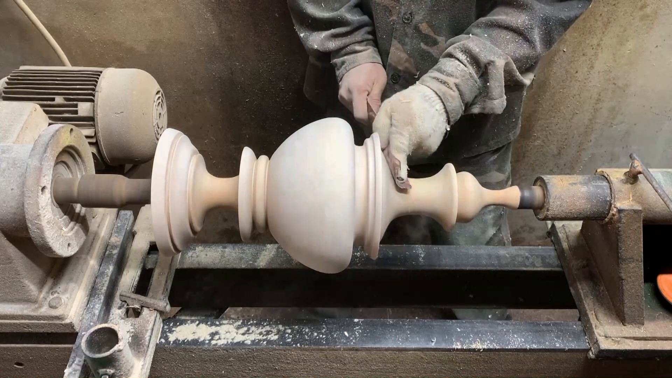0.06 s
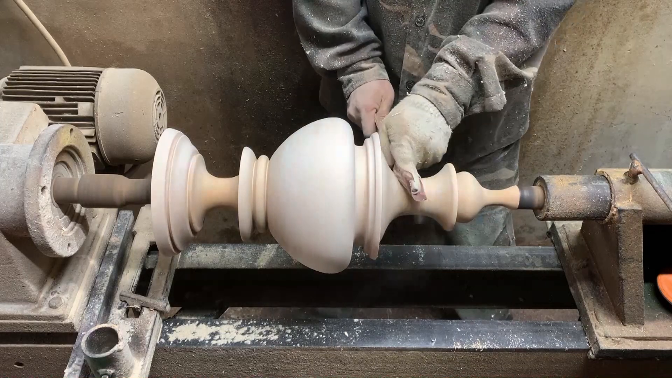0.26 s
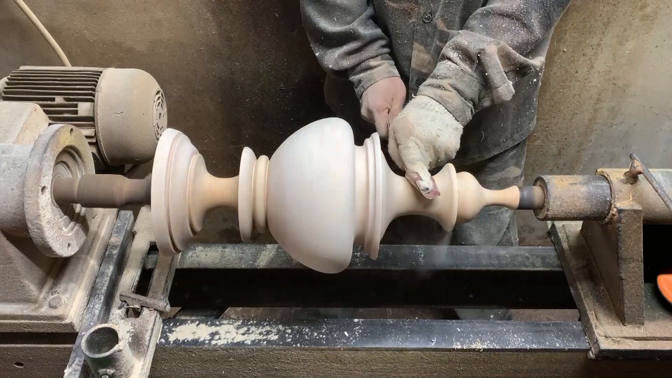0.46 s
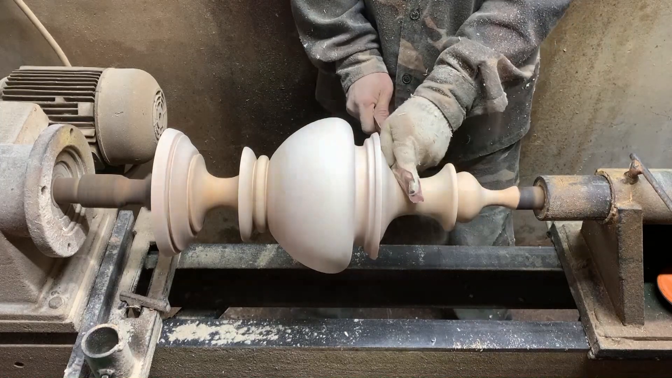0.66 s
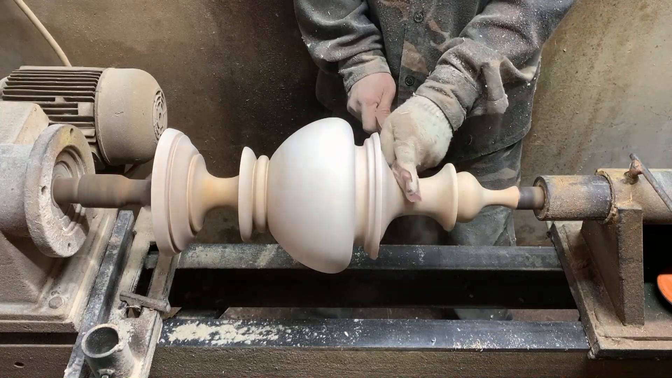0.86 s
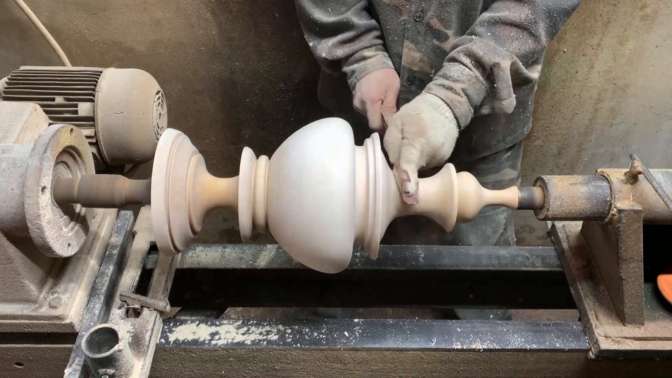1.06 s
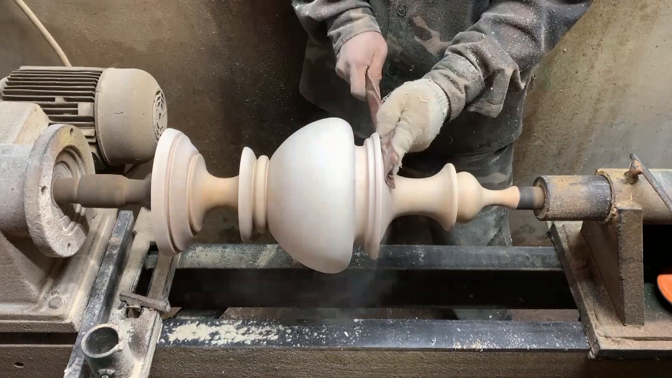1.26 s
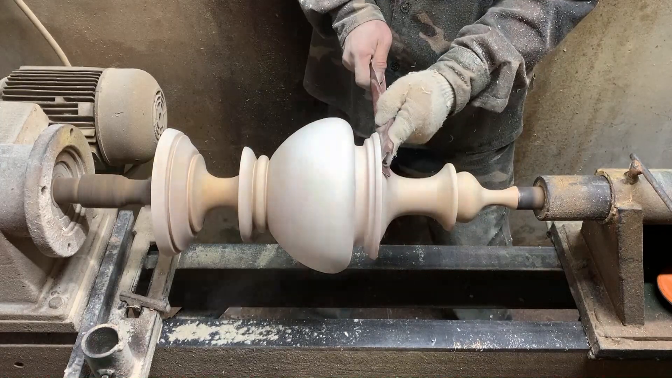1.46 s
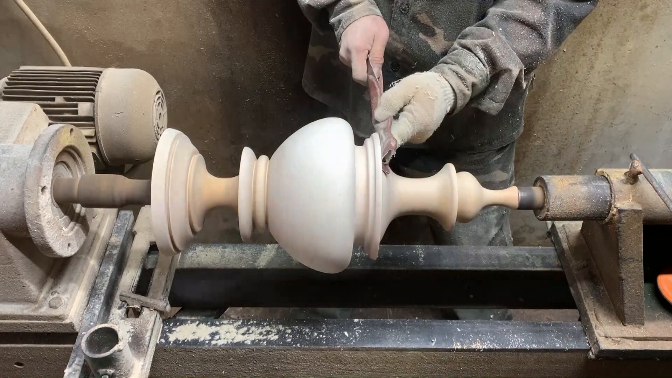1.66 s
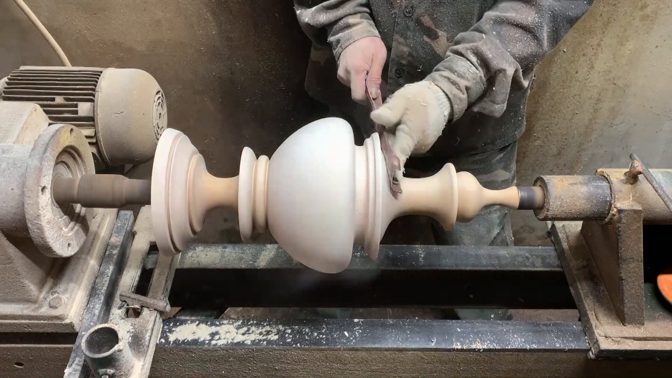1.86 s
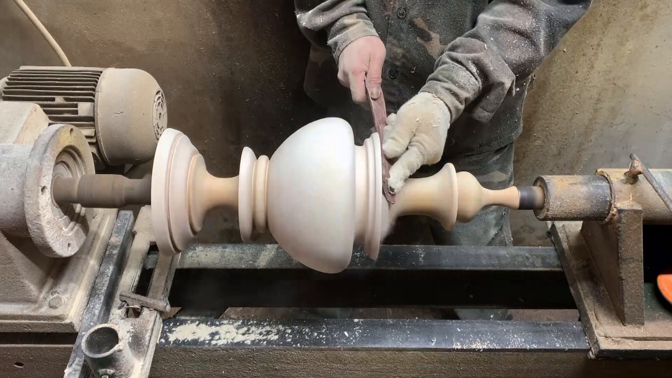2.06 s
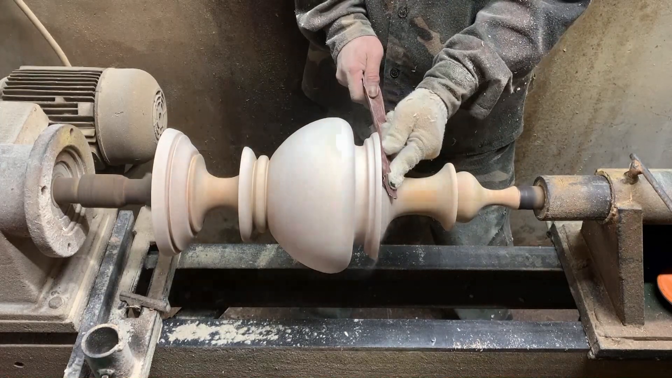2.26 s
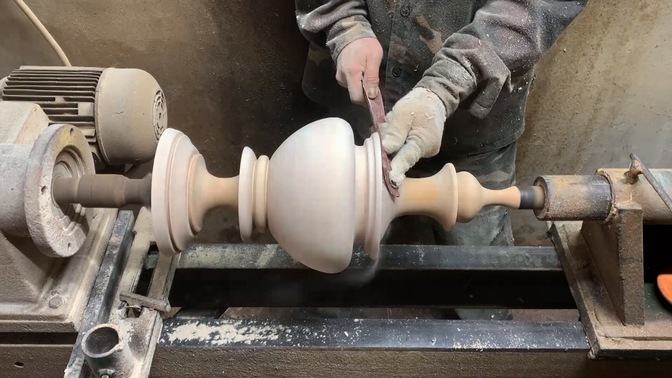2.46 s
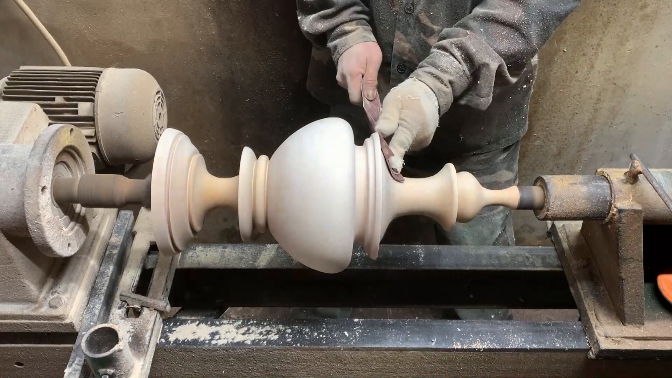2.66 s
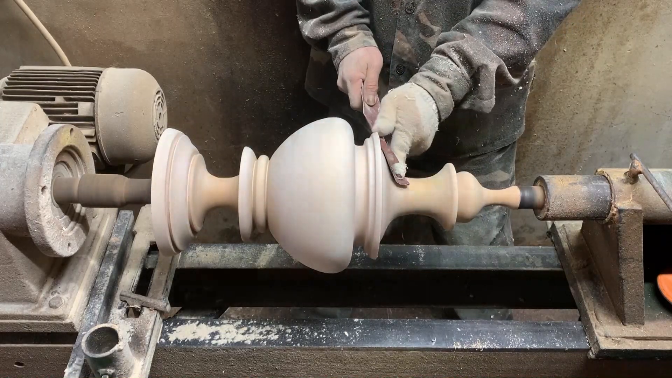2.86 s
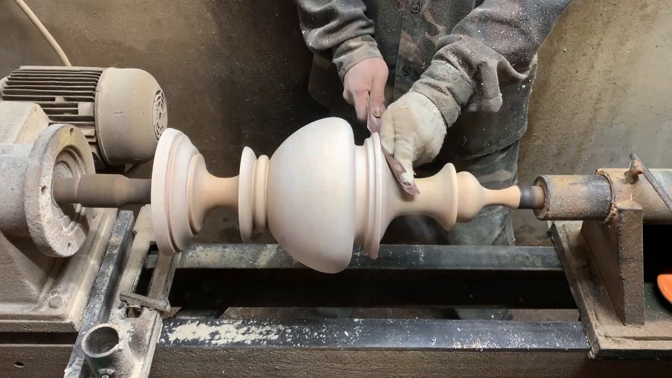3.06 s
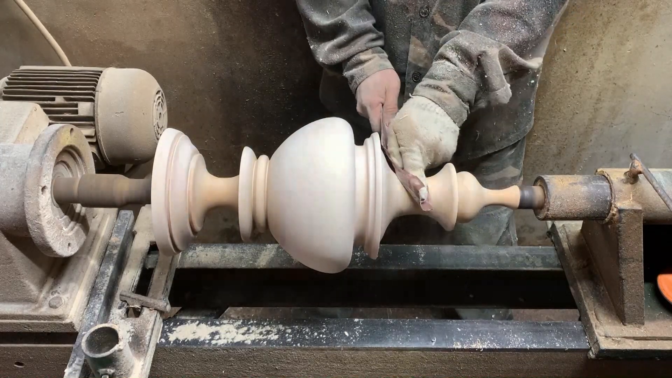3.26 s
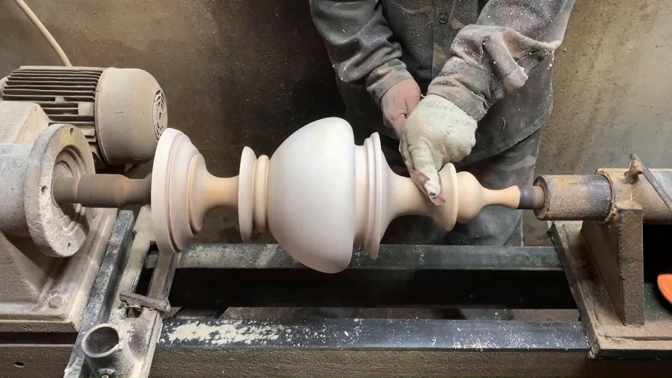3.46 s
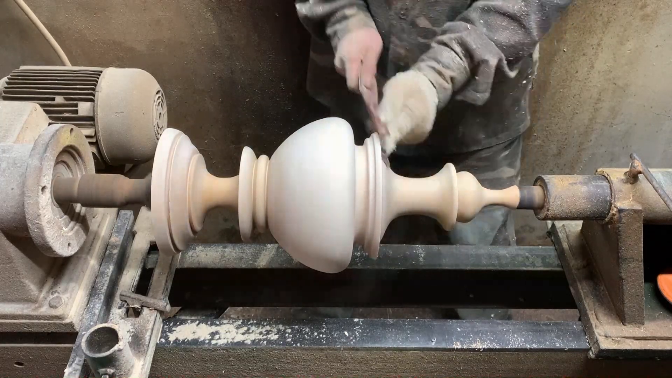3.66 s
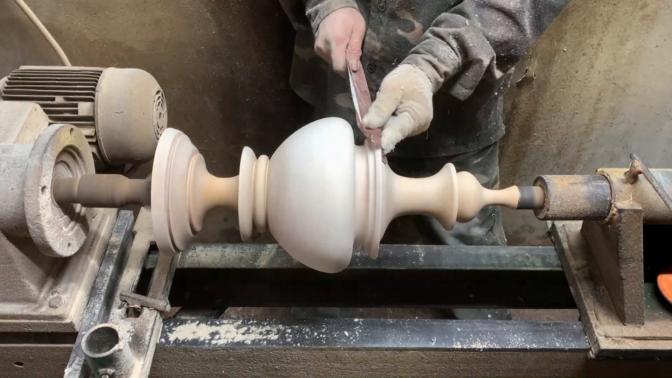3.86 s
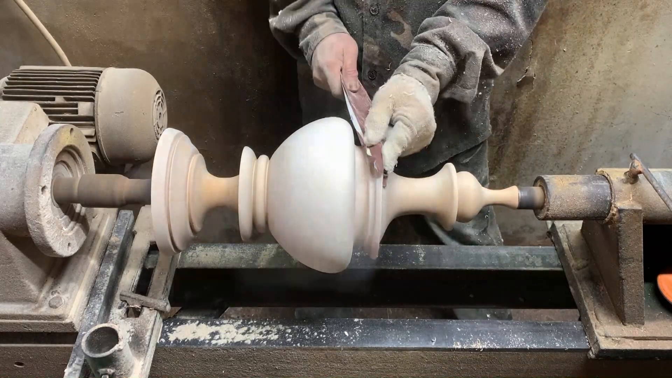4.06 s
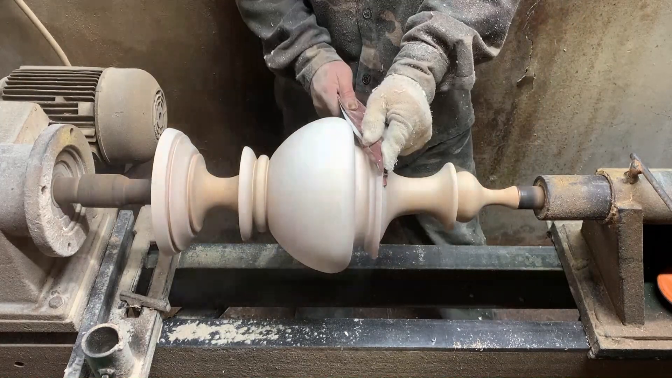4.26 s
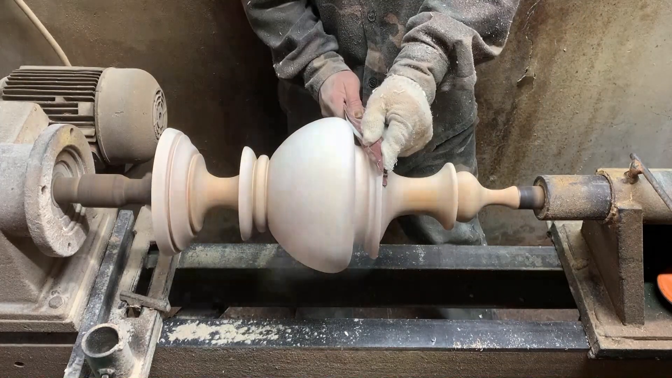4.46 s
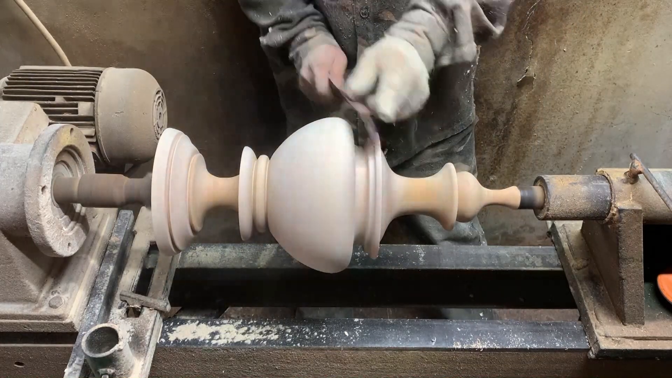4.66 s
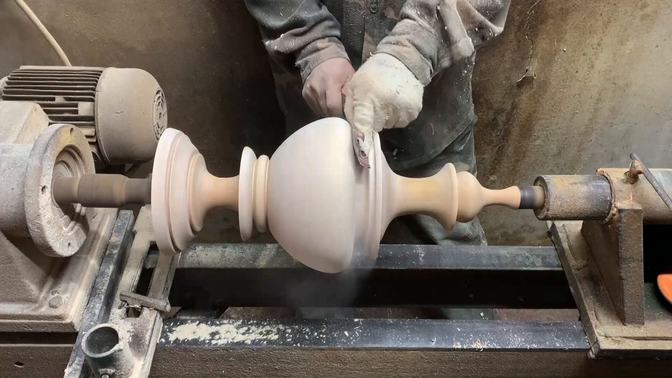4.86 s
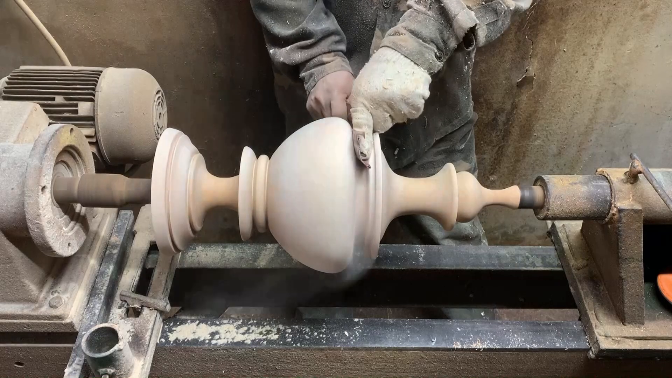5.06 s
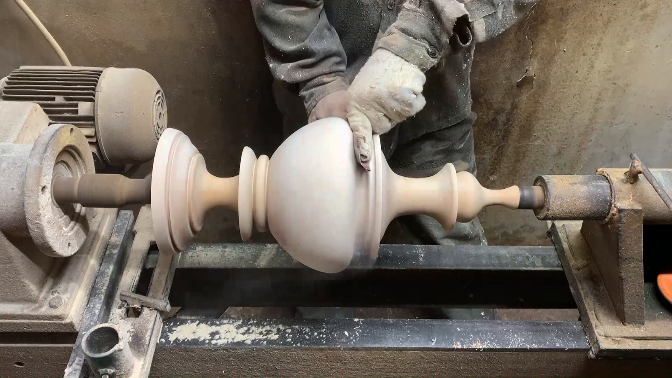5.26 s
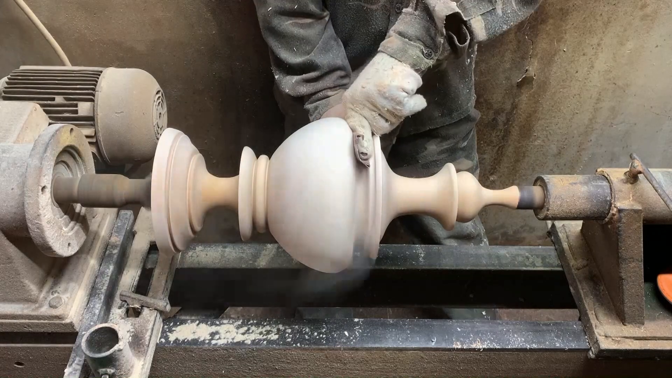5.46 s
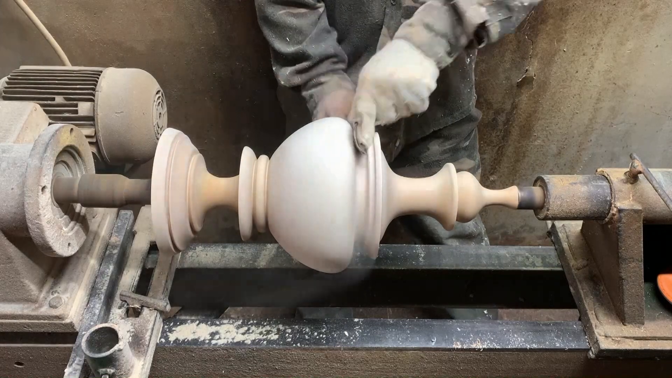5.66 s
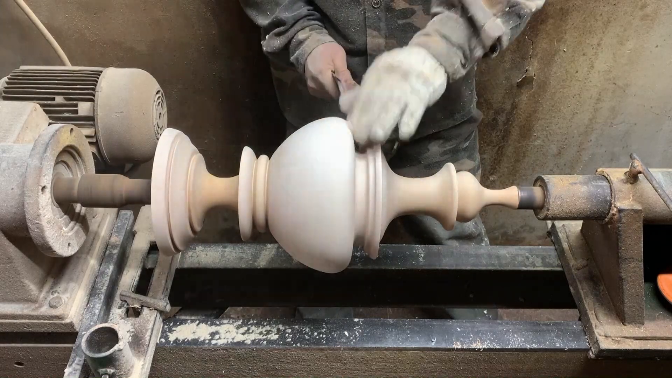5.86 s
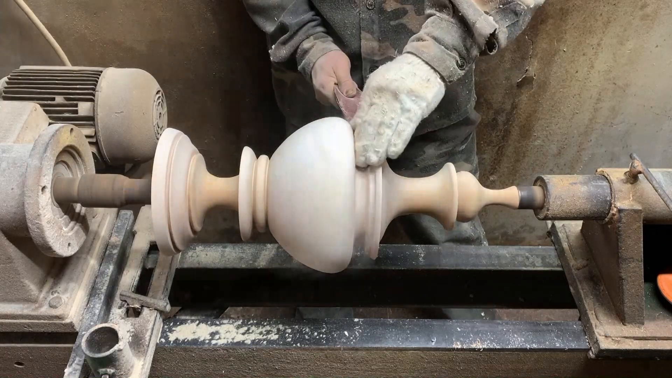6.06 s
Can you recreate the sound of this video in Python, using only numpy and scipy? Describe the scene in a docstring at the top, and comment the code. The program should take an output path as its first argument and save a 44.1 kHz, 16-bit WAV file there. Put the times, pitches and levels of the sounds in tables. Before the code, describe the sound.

Continuous dry rubbing hiss of abrasive paper on fast-turning wood, above a buzzing lathe drone and whine, buffeted by low puffs of air.

```python
"""Hand-sanding on a lathe

Sandpaper is held by hand against a turned wooden piece spinning on an electric lathe, lifted briefly twice. The
paper is shaped noise and tiny clicks under a pressure curve; its edge rings briefly where it catches, and once
a soft broad swell of scraping rises near 2 kHz. Under it the spindle drive growls once per turn through
headstock resonances, and the motor whines in tones. The draught of the spinning piece buffets the two
microphone ports: low noise, puffs and sharper slaps."""
import sys
import numpy as np
from scipy import signal
from scipy.fft import rfft, irfft, next_fast_len
from scipy.io import wavfile
from scipy.ndimage import uniform_filter1d, map_coordinates

SR = 44100
rng = np.random.default_rng(int(sys.argv[2]) if len(sys.argv) > 2 else 0)


def generate_wav(sig):
    """Save sig (samples, or channels by samples) to the path in sys.argv[1] as 16-bit PCM at SR."""
    pcm = np.round(np.clip(np.atleast_2d(sig).T, -1, 1) * 32767).astype(np.int16)
    wavfile.write(sys.argv[1], SR, pcm)


N = 269892

TURNS_PER_S = 39.4  # unbraked spindle
TOUCH_S, LIFT_S = 0.0084, 0.016  # how fast the paper meets and leaves the wood
# paper held to the wood: start_s, end_s, level_db, easing_db_per_s, braking_turns_per_s
STROKE_ROWS = [(-.2, 4.692, -39.4, 0.12, 0), (4.798, 5.745, -33.5, 1, 0.52), (5.945, 6.3, -40, -6, 0.026)]


def amp(db):
    """Decibels to gain."""
    return 10 ** (np.asarray(db) / 20)


def unit(x):
    """x at rms 1."""
    return x / np.sqrt(np.mean(x ** 2) + 1e-20)


def along(points, hz):
    """Each column of (freq_hz, ..) points, interpolated on a log axis."""
    point_hz, *columns = np.transpose(points)
    return np.array([np.interp(np.log(hz + 1), np.log(point_hz + 1), c) for c in columns])


def clock():
    """The time of each sample in seconds."""
    return np.arange(N) / SR


def curves(rows):
    """One value per sample for each column after the time."""
    knot_s, *columns = np.transpose(rows)
    return [np.interp(clock(), knot_s, c) for c in columns]


def wobble(rate_hz):
    """A smooth random curve, rate_hz knots a second."""
    knots = rng.standard_normal(int(N * rate_hz / SR) + 4)
    return map_coordinates(knots, [clock() * rate_hz])


def filtered(x, response):
    """x times a response of frequency."""
    size = next_fast_len(N + SR // 2)
    hz = np.fft.rfftfreq(size, 1 / SR)
    return irfft(rfft(x, size) * response(hz), size)[..., :N]


def coloured(x, spectrum):
    """x shaped by the given spectrum, at rms 1."""
    return unit(filtered(x, lambda hz: amp(along(spectrum, hz))))


def noise():
    """White noise, unrelated at the two ports as in a hard-walled shop."""
    return rng.standard_normal((2, N))


def patchy(x, depth_db, size=512):
    """Neighbouring bands swell and fade apart from each other."""
    bands = signal.stft(x, nperseg=size)[2]
    field = rng.standard_normal(bands.shape[1:])
    field = uniform_filter1d(field, size=4, axis=0)
    field = uniform_filter1d(field, size=7, axis=1)
    return signal.istft(bands * amp(depth_db * unit(field)), nperseg=size)[1][:, :N]


def narrow(centre_hz, width_hz):
    """A noisy ring of rms 1 around one frequency."""
    return unit(filtered(noise(), lambda hz: 1 / (1 + ((hz - centre_hz) / width_hz) ** 2)))


def held(start_s, end_s, rise_s, fall_s):
    """0 to 1 and back, with soft edges."""
    t = clock()
    on = (1 + np.tanh((t - start_s) / rise_s / 2)) / 2
    off = (1 + np.tanh((end_s - t) / fall_s / 2)) / 2
    return on * off


def swell(centre_s, half_length_s):
    """A smooth bump of height 1."""
    return np.exp(-((clock() - centre_s) / half_length_s) ** 2)


def angle(start_turns=0.2002, slip_turns=0.31, slip_every_s=1.003, first_slip_s=0.845):
    """Turns done so far: a hard stroke brakes the spindle, and the beat slips back and forth."""
    braking = sum(drop * held(begin, end, TOUCH_S, LIFT_S) for begin, end, _, _, drop in STROKE_ROWS)
    slipped = (clock() - first_slip_s) // slip_every_s % 2 == 0
    return start_turns + np.cumsum(TURNS_PER_S - braking) / SR - slip_turns * slipped


def once_a_turn():
    """A cosine that peaks at each throb of the spindle."""
    return np.cos(2 * np.pi * angle())


def tone(pitch_hz, drift_rad, throb):
    """An unsteady tone of rms 1 that swells with each turn of the spindle."""
    phase = 2 * np.pi * np.cumsum(pitch_hz * np.ones(N)) / SR
    phase = phase + drift_rad * wobble(13) + rng.uniform(0, 2 * np.pi, (2, 1))
    return unit(np.sin(phase) * (1 + throb * once_a_turn()) * amp(1.3 * wobble(8)))


def draught(eddies_db=-4.5, lumps_db=1.8, steady_db=-50.1, steady_lumps_db=3.2, shared=0.3):
    """Air thrown off the piece rumbles at the ports; gusts come in eddies that build up and die away."""
    # start of no edge, but a peak: peak_s, level_db (before eddies_db), eddy_life_s
    gust_rows = [(.05, -37, .06), (1.44, -28, .08), (1.63, -33, .05), (1.78, -35, .025),
                 (2.44, -30.5, .045), (3.41, -33, 0.025), (3.54, -29.5, .07), (4.24, -35, .07),
                 (4.755, -28.5, .06), (4.95, -34.5, .22), (5.36, -24, .024), (5.437, -30, 0.035),
                 (5.85, -32.5, .06), (6.1, -32.5, .025)]
    # rumble spectrum: freq_hz, relative level_db
    buffet_spectrum = [(20, -0.5), (55, -0.5), (105, 3.2), (160, -3.5), (260, -11), (450, -23), (1500, -63)]
    air = lambda: coloured(noise() + shared * rng.standard_normal(N), buffet_spectrum)
    eddy_power = sum((amp(db) * np.exp(-np.abs(clock() - s) / life_s)) ** 2 for s, db, life_s in gust_rows)
    gusts = np.sqrt(eddy_power) * amp(eddies_db + lumps_db * wobble(30)) * air()
    steady = amp(steady_db + steady_lumps_db * wobble(9)) * air()
    return gusts + steady


def puffs(jitter_rad=0.66):
    """Single puffs of air thump: a push, then a pull, reaching each port at its own moment."""
    # centre_s, level_db, pitch_hz (sets the speed of the pulse)
    puff_rows = [(1.337, -28, 74.9), (1.394, -26, 70), (1.426, -25, 75), (2.42, -29, 70), (2.453, -25, 70),
                 (3.491, -18.5, 48), (3.592, -25, 58), (4.238, -30, 65.05), (4.699, -27, 62),
                 (4.745, -24, 62), (4.764, -22.5, 69.9), (4.869, -30, 70), (4.946, -30, 58),
                 (5.347, -26, 75), (5.364, -17.5, 62), (5.432, -25, 68), (5.821, -29, 80.1),
                 (5.882, -28, 58), (6.091, -29, 50)]
    out = np.zeros((2, N))
    for centre_s, level_db, pitch_hz in puff_rows:
        u = 2 * np.pi * pitch_hz * (clock() - centre_s) + rng.normal(0, jitter_rad, (2, 1))
        out -= amp(level_db) * 2 * u / (1 + u ** 2) ** 2
    return out


def slaps(jitter_rad=0.41):
    """Sharper slaps of air: a pressure peak between two shallow dips, each port at its own moment."""
    # centre_s, peak level_db, pitch_hz (sets the speed of the pulse)
    slap_rows = [(1.452, -22.5, 170), (1.631, -25, 190), (2.239, -31, 210), (2.418, -32, 210),
                 (3.399, -29, 170), (3.447, -31, 210), (3.551, -20, 215), (4.614, -30, 190),
                 (4.988, -29, 160), (5.346, -26, 190), (5.821, -28, 170)]
    out = np.zeros((2, N))
    for centre_s, level_db, pitch_hz in slap_rows:
        u = np.pi * pitch_hz * (clock() - centre_s) + rng.normal(0, jitter_rad, (2, 1))
        out += amp(level_db) * (1 - 2 * u ** 2) * np.exp(-u ** 2)
    return out


def motor(fan_db=-38.0, whine_gain_db=2.0, hum_gain_db=-0.4, whistle_db=-64.0, whistle_hz=12031):
    """Whine, hum and a thin electrical whistle, over ringing bearings and the rush of fan and belt."""
    # whine, sinks and grows as the paper moves to the wide bulb; upper line is one turn rate above:
    # time_s, pitch_hz, level_db, upper_level_db (levels before whine_gain_db)
    whine_rows = [(0, 1426, -48, -53), (1.2, 1427, -47, -52), (1.55, 1412, -48, -58),
                  (1.95, 1424, -46, -53), (2.4, 1416, -53, -57), (2.65, 1426, -46, -49),
                  (3.7, 1427, -46, -50), (3.95, 1404, -48, -60), (4.2, 1404, -43, -56),
                  (4.35, 1393, -44, -55), (4.85, 1391, -45, -55), (5.1, 1405, -42.5, -56),
                  (5.45, 1402, -46, -56), (5.7, 1393, -44, -51), (6.12, 1392, -51, -54)]
    # wavering hum tones: pitch_hz, level_db (before hum_gain_db)
    hum_rows = [(92, -58), (657, -45), (672, -49), (711, -48)]
    # thin ringing of the bearings: centre_hz, width_hz, mid level_db
    bearing_rows = [(6130, 220, -60), (6810, 110, -59)]
    # fan and belt spectrum: freq_hz, relative level_db
    fan_spectrum = [(25, -17), (100, 0), (200, 2.5), (330, -.8), (520, 4.5), (1000, -2), (1230, 2.5),
                    (1600, -2), (1880, -0.5), (2400, -3.5), (2900, -13.5), (4500, -16.5), (6600, -21),
                    (8500, -30), (10000, -35), (12500, -33), (15000, -48)]
    whine_hz, whine_db, upper_db = curves(whine_rows)
    whine = amp(whine_db) * tone(whine_hz, drift_rad=0.45, throb=0.55)
    whine += amp(upper_db) * tone(whine_hz + TURNS_PER_S, drift_rad=0.35, throb=0.3)
    hum = sum(amp(db) * tone(hz, drift_rad=1.2, throb=0.68) for hz, db in hum_rows)
    whistle = amp(whistle_db) * tone(whistle_hz, drift_rad=0.8, throb=0.1)
    ringing = sum(amp(db + 3.5 * wobble(14)) * narrow(hz, width_hz) for hz, width_hz, db in bearing_rows)
    fan = amp(fan_db + 0.81 * wobble(7)) * coloured(patchy(noise(), depth_db=1.6), fan_spectrum)
    return amp(whine_gain_db) * whine + amp(hum_gain_db) * hum + whistle + ringing + fan


def knocks(lead_s=0.004003, scatter_s=0.002):
    """Drive knocks at rms 1: one click a turn, never quite on time."""
    turns = np.maximum.accumulate(angle())
    times_s = np.interp(np.arange(1, int(turns[-1])), turns, clock()) - lead_s
    scattered_s = times_s + rng.normal(0, scatter_s, (2, len(times_s)))
    places = np.clip(scattered_s * SR, 0, N - 1).astype(int)
    return unit(np.array([np.bincount(port, minlength=N) for port in places]))


def evened(x, evenness=0.45):
    """x with its energy partly evened out from turn to turn."""
    power = np.abs(uniform_filter1d(np.mean(x ** 2, axis=0), size=int(SR / TURNS_PER_S)))
    return x * (power / power.mean() + 1e-6) ** (-evenness / 2)


def spindle(growl_db=-34.6, throb_db=2.0, buzz_db=0.7, buzz_hz=120.0, knock_db=-5):
    """The drive buzzes, knocks and rubs hardest once per turn and rings the cast headstock."""
    # headstock resonances: centre_hz, width_hz, relative left_db, relative right_db
    headstock_rows = [(556, 60, -16, -16.5), (656.5, 42.4, -2.5, 0.7), (713, 62.5, 1.1, -4),
                      (1389, 54, -.6, -5), (1436, 32, -12, -9.5)]
    # growl level: time_s, level_db (relative to growl_db)
    growl_rows = [(0, 0.2), (.9, -0.3), (1.3, 0.64), (2.2, 0.7), (2.9, 0.36), (4.15, .3), (4.35, -0.5),
                  (4.72, -1), (4.88, -2), (5.05, -.5), (5.6, .1), (6.12, 0.2)]
    load = amp(throb_db * once_a_turn() + buzz_db * np.sin(2 * np.pi * buzz_hz * clock()))
    growl = np.zeros((2, N))
    for centre_hz, width_hz, left_db, right_db in headstock_rows:
        # two poles in a row: a rounded top with steep skirts
        ring = lambda hz: (1j * hz * 2 * width_hz / (centre_hz ** 2 - hz ** 2 + 2j * hz * width_hz)) ** 2
        rung = filtered(amp(knock_db) * knocks() + noise(), ring)
        growl += amp([[left_db], [right_db]]) * evened(rung)
    level_db, = curves(growl_rows)
    return amp(growl_db + level_db) * unit(evened(growl * load))


def rattles(half_length_s=0.0046):
    """Now and then the drive knocks harder and the headstock rings for a few cycles."""
    # centre_s, peak level_db, pitch_hz
    rattle_rows = [(.577, -28, 670), (1.193, -26, 695), (1.601, -27, 673), (1.728, -27, 680),
                   (2.127, -28, 680), (2.407, -27, 670), (2.533, -27, 704), (3.5, -26, 680),
                   (4.77, -22, 680)]
    ring = lambda s, hz: np.sin(2 * np.pi * hz * (clock() - s) + rng.uniform(0, 2 * np.pi, (2, 1)))
    return sum(amp(db) * swell(s, half_length_s) * ring(s, hz) for s, db, hz in rattle_rows)


def rub_notes():
    """The paper's edge catches and rubs brief notes, and once a soft broad swell of scraping rises near 2 kHz:
    narrow noise under a short bump."""
    # centre_s, level_db, pitch_hz, width_hz, half_length_s
    note_rows = [(0.67, -44, 980, 50, 0.02), (.7, -46, 2050, 350, 0.11), (1.012, -36.5, 967, 60, .03),
                 (4.975, -35.5, 2452, 650, 0.046)]
    return sum(amp(db) * swell(s, length_s) * narrow(hz, width_hz)
               for s, db, hz, width_hz, length_s in note_rows)


def pressure():
    """Gain of the rubbing: strokes land, ease off or build, and lift; the hand's push varies briefly."""
    # brief changes of hand pressure: centre_s, change_db, half_length_s
    push_rows = [(.02, 2.6, .06), (0.213, 2.5, .035), (.62, 0.7, .08), (.82, -0.5, .06), (1.28, 2, 0.047),
                 (1.898, 0.75, 0.14), (2.559, 0.5, 0.076), (2.746, -2.5, 0.1), (3.033, 1.5, .025),
                 (3.154, 4, 0.041), (3.44, -1, .11), (3.64, 1.4, .035), (3.76, -2, 0.031), (3.89, -3, .035),
                 (4.03, 1.5, 0.069), (5.19, 1.3, 0.14), (5.57, 1.2, .04)]
    strokes = sum(held(start, end, TOUCH_S, LIFT_S) * amp(db - easing * np.maximum(clock() - start, 0))
                  for start, end, db, easing, _ in STROKE_ROWS)
    return strokes * amp(sum(db * swell(s, length_s) for s, db, length_s in push_rows))


def grit(rate_hz, share):
    """Abrasive grains snap wood fibres: tiny clicks of uneven size over smooth friction."""
    clicks = unit(noise() * (rng.random((2, N)) < rate_hz / SR))
    share = np.clip(share, 0, 1)  # click share of the power
    return np.sqrt(share) * clicks + np.sqrt(1 - share) * noise()


def sandpaper(hiss_db=-0.4, fizz_db=-4.7, scrape_db=-9.5,
              flat_hiss_db=1.0, flat_fizz_db=-6.0, flat_scrape_db=8.0,
              flutter_db=0.9, tremor_db=0.7, patches_db=1.9,
              edge_lead_s=0.012, slide_s=0.019, firm_db=-38, bite=0.53):
    """The strip hisses on the wood; on its edge it fizzes, laid flat or pressed hard it scrapes lower."""
    # strip slides off its edge and lies flat in a hollow: start_s, end_s, flatness (0-1)
    slide_rows = [(0.178, 0.763, 0.77), (0.934, 1.17, 0.88), (3.204, 3.663, 1), (4.9, 5.33, 0.29)]
    # spectra: freq_hz, relative level_db
    hiss_spectrum = [(300, -18), (1200, -10), (2300, -0.5), (3100, -2), (5000, 0), (7200, 2), (9000, -2),
                     (11000, -13), (15500, -20)]
    fizz_spectrum = [(4000, -28), (8000, 4), (11500, -1.5), (12500, -2), (14000, -6), (15700, -13)]
    scrape_spectrum = [(500, -24), (1400, -6), (2200, -6), (3000, -4.5), (4000, -5.5), (5000, -8),
                       (9000, -45)]
    flat = sum(flatness * held(start, end, slide_s, slide_s) for start, end, flatness in slide_rows)
    press = pressure()
    # the edge of the strip meets and leaves the wood first
    edge_press = np.interp(clock() + edge_lead_s, clock(), press)

    def rub(spectrum):
        """Grit that trembles as the contact patch shifts and the paper flutters over the grain."""
        tremble_db = tremor_db * wobble(34) + flutter_db * np.array([wobble(300), wobble(300)])
        return amp(tremble_db) * coloured(patchy(grit(rate_hz=3000, share=0.28), patches_db), spectrum)

    hiss = amp(hiss_db + flat_hiss_db * flat) * rub(hiss_spectrum)
    fizz = amp(fizz_db + flat_fizz_db * flat) * rub(fizz_spectrum)
    # bite: dB of extra scrape per dB of pressure beyond firm_db
    extra_scrape = (press / amp(firm_db)) ** bite
    scrape = amp(scrape_db + flat_scrape_db * flat) * extra_scrape * rub(scrape_spectrum)
    return press * (hiss + scrape) + edge_press * fizz


def scene():
    """Moving air, lathe and paper."""
    air = draught() + puffs() + slaps()
    lathe = motor() + spindle() + rattles()
    paper = rub_notes() + sandpaper()
    return air + lathe + paper


def record(dry, top_hz=15800):
    """Each port colours the treble in its own way; nothing passes above the band limit."""
    # port colour: freq_hz, left_db, right_db
    port_rows = [(4500, 1.5, 1.5), (6360, 1.5, 2.5), (7910, 0.5, 0), (8030, -2.5, 11.5), (9520, 5.5, 9),
                 (9740, -5, 7.5), (11400, 5, 5)]
    return filtered(dry, lambda hz: amp(along(port_rows, hz)) * (hz < top_hz))


dry = scene()
out = record(dry)
generate_wav(out)
```